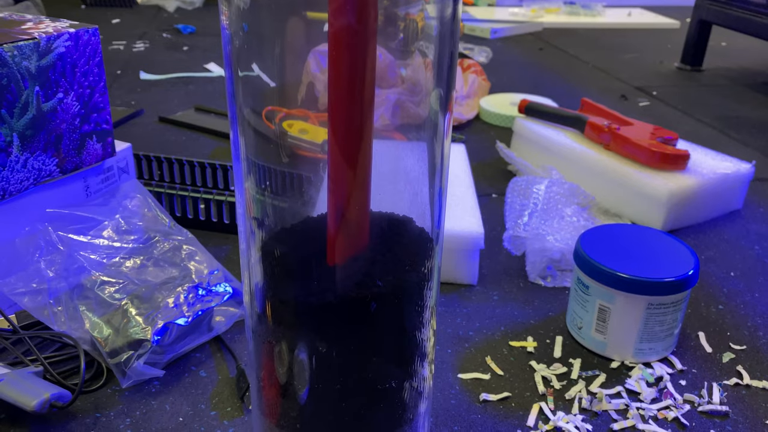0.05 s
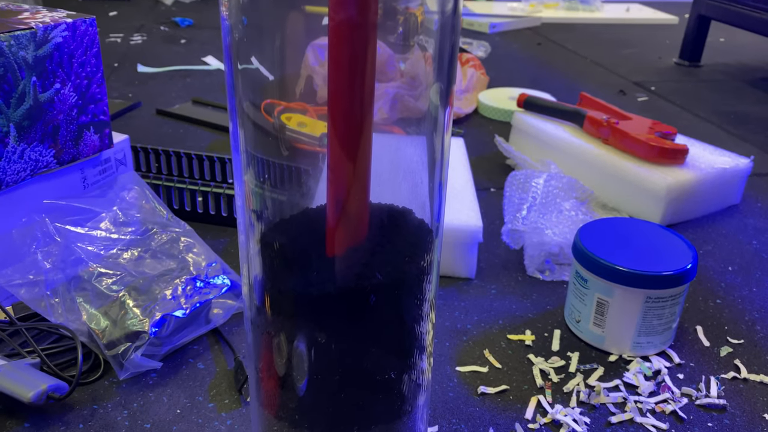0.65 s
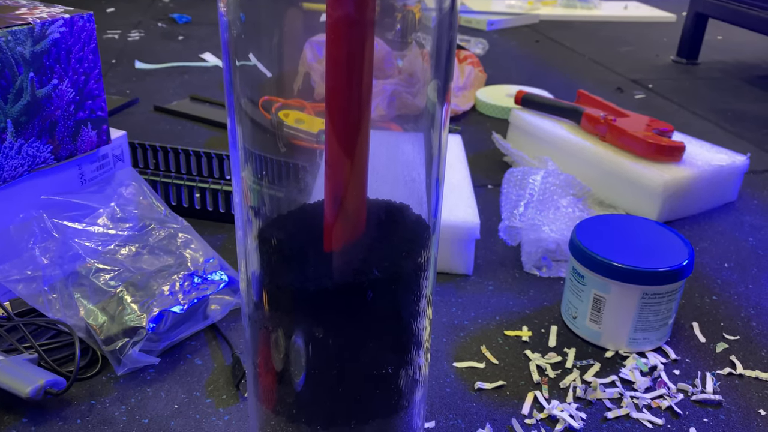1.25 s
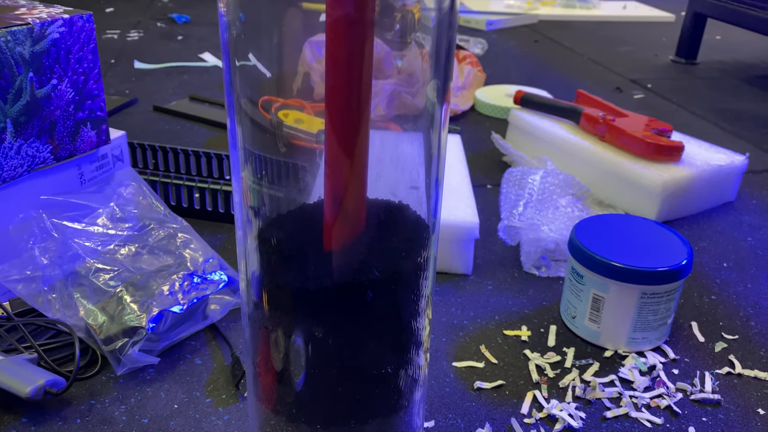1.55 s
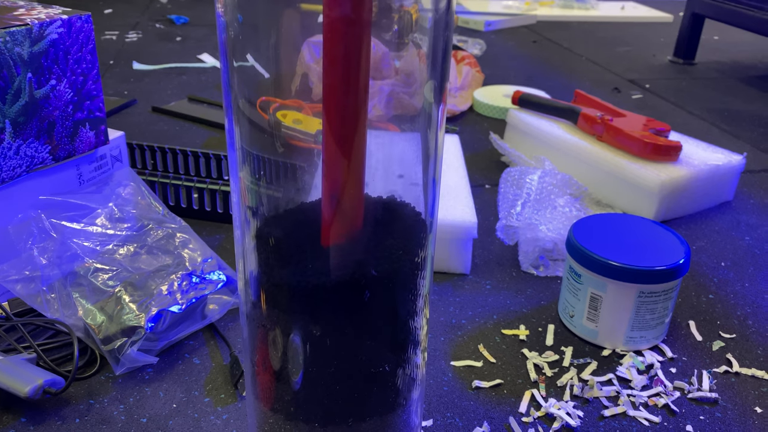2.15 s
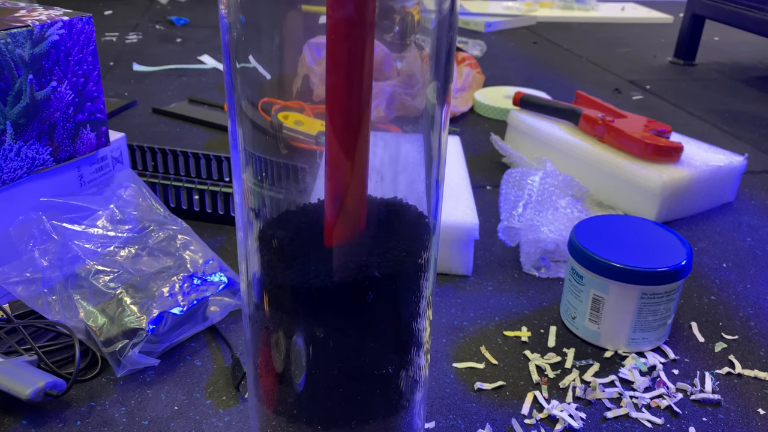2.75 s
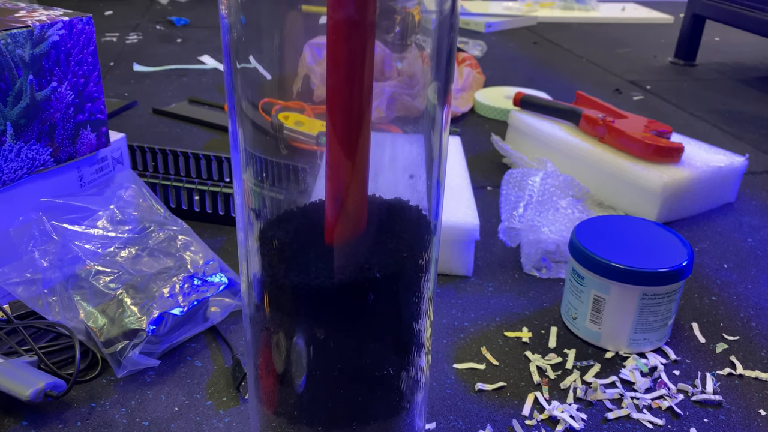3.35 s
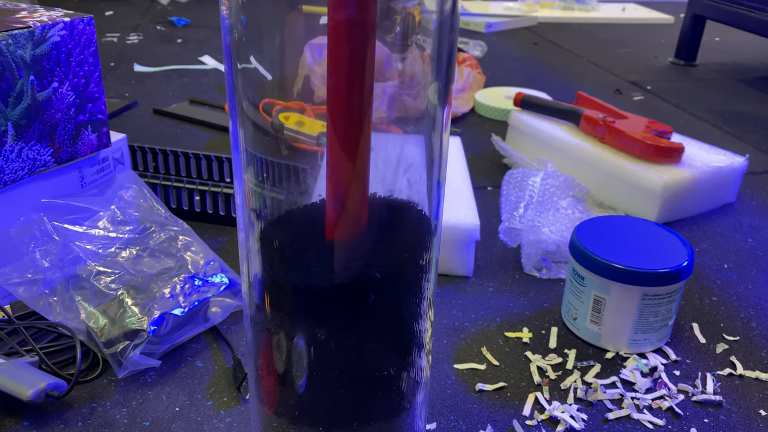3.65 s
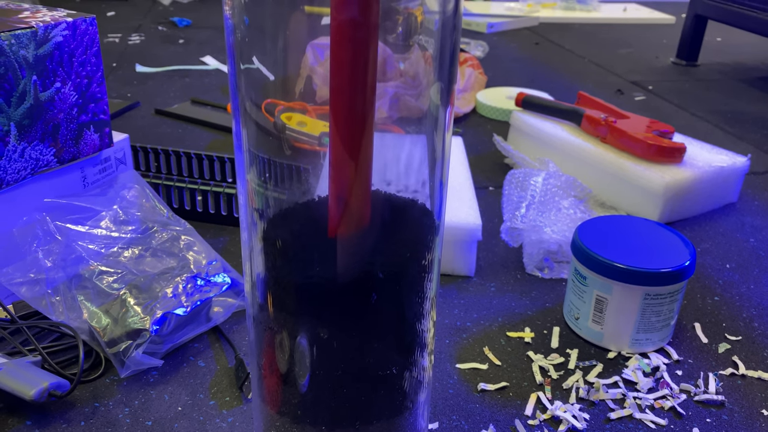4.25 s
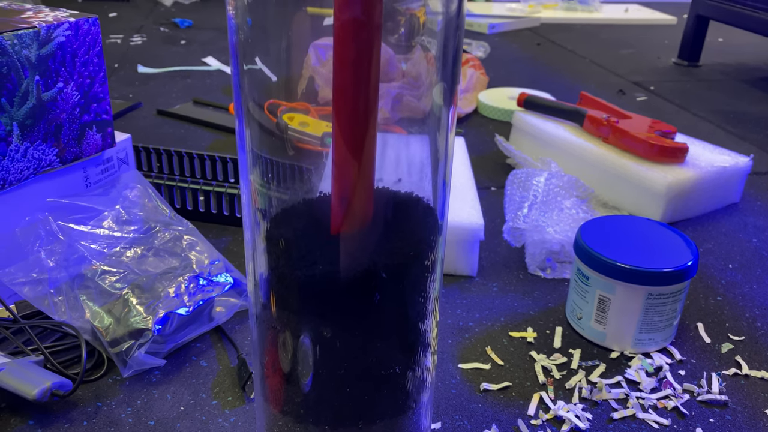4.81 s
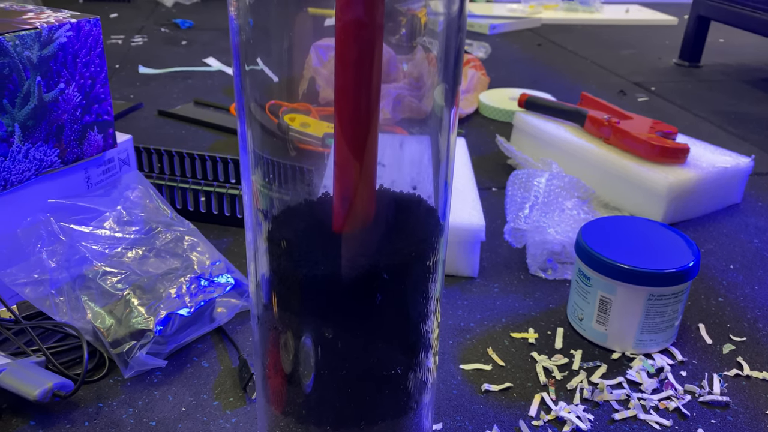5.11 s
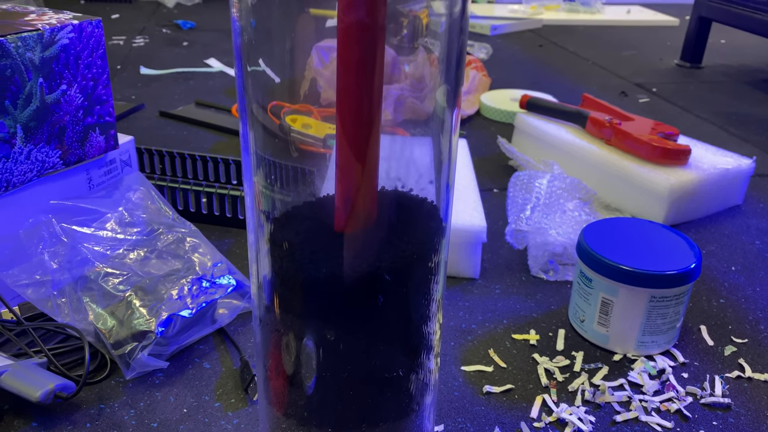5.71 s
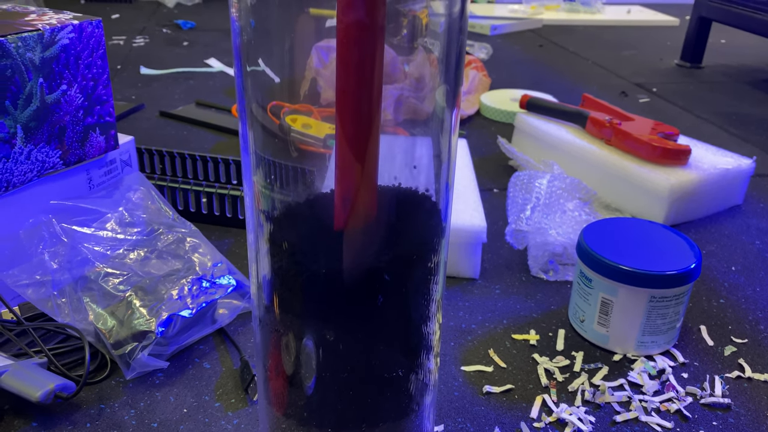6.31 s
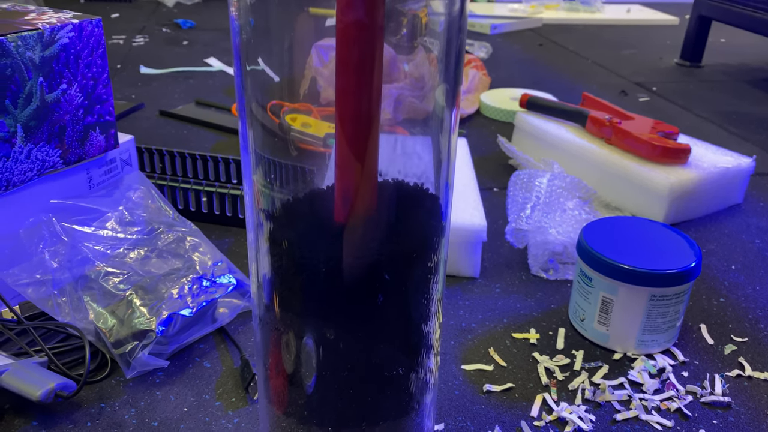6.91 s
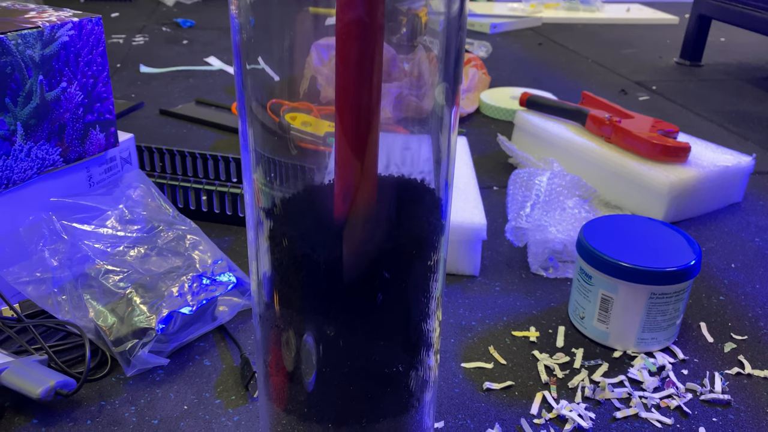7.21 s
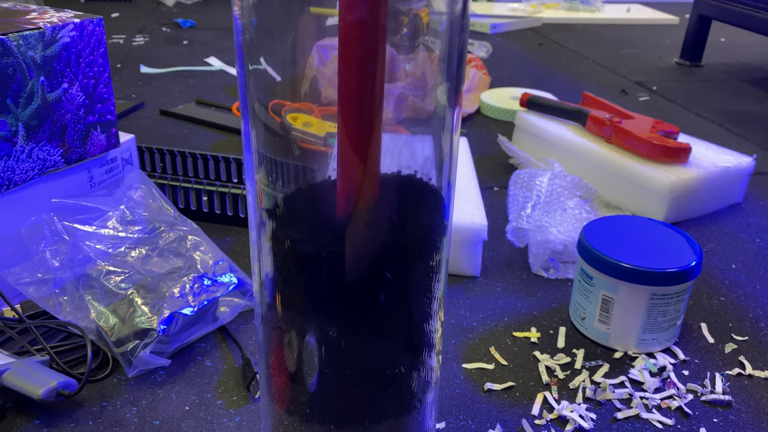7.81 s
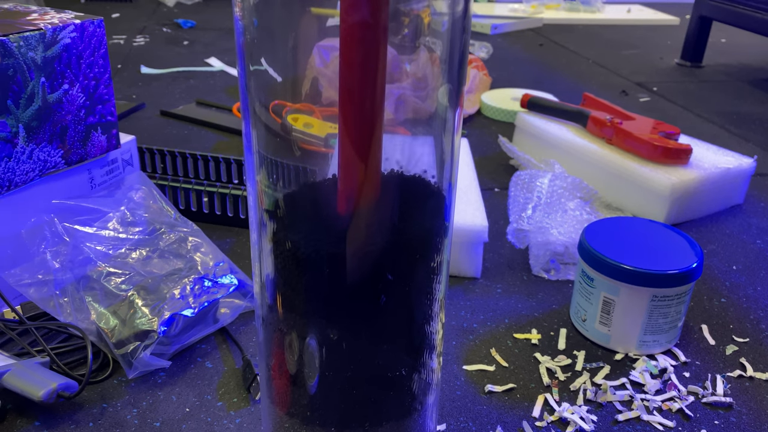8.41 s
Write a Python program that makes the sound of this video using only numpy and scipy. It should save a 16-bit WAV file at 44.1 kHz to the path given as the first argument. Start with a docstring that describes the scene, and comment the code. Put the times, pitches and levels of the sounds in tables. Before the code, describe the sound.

Air hisses from a hose, then water sputters into a plastic tube of filter grains and becomes a steady spray over a low pump rumble.

```python
"""Filling a water filter

Water is let into a nearby acrylic tube packed with filter grains. First air hisses out of the
feed hose and the fitting knocks; then the jet arrives, sputters and thickens to a steady spray.
The spray is many tiny impacts; bigger spits slap the wall, small bubbles ring, two large ones plop.
The room adds a short echo, and aquarium pumps and fans rumble behind it all."""
import sys
import numpy as np
from scipy import signal
from scipy.fft import rfft, irfft, next_fast_len
from scipy.io import wavfile
from scipy.ndimage import uniform_filter1d, map_coordinates

SR = 44100
rng = np.random.default_rng(int(sys.argv[2]) if len(sys.argv) > 2 else 0)


def to_wav(sig):
    """Store sig (one row per channel, or 1-D mono) as 16-bit WAV at the path in sys.argv[1].

    Samples outside -1..1 are clipped; the rate is SR.
    """
    pcm = np.clip(np.atleast_2d(sig), -1, 1) * 32767
    pcm = np.round(pcm).astype(np.int16)
    wavfile.write(sys.argv[1], SR, pcm.T)  # frames by channels


N = 381906

# A pair of signals is one part that both microphones share and one part that they do not.
# microphones() turns it into left and right. A decay_s is the time to fade by 60 dB.

# The biggest spits of water against the wall: start_s, level_db, splatter_s, brightness_db_per_octave
WALL_SPITS = [(0.116, -52, 0.011, -4), (0.2583, -37.5, 0.012, -5), (0.274, -42.5, 0.013, -5),
              (0.2887, -40, 0.019, -4), (0.3203, -36, 0.007, 1), (0.3377, -35, 0.009, -4),
              (0.351, -37, 0.02, 2), (0.361, -31, 0.022, 7), (0.375, -31, 0.017, 5),
              (0.4092, -34, 0.012, -1.0), (0.586, -29, 0.006, 0), (0.9462, -31.5, 0.018, -11),
              (1.2314, -39, 0.006, -1.0), (1.252, -33, 0.031, -4), (1.3057, -32.5, 0.014, -3),
              (1.3178, -32.5, 0.02, -5), (1.323, -30.5, 0.012, -4), (1.3734, -32, 0.009, -2),
              (1.392, -31.5, 0.019, 0), (1.4074, -33, 0.027, -4), (1.423, -30, 0.0076, 0),
              (1.4422, -31, 0.011, 1.0), (1.4712, -34.5, 0.037, -3.0), (1.484, -35, 0.0096, 1.0),
              (1.518, -34, 0.022, 0.0), (1.545, -29.5, 0.02, 0.0), (1.5649, -31.5, 0.012, 1.0),
              (1.6194, -28, 0.012, -2.0), (1.6358, -21.5, 0.0043, 2), (1.753, -28, 0.013, -1),
              (1.791, -26.5, 0.017, -2), (1.804, -31, 0.021, -1), (1.8529, -22.5, 0.011, -3),
              (1.863, -28, 0.012, -2), (1.969, -27.5, 0.012, 2), (2.0239, -33, 0.019, 1),
              (2.0583, -21.5, 0.007, 3), (2.068, -27, 0.015, 2), (2.1353, -24.5, 0.005, 3),
              (2.2398, -30, 0.017, -5), (2.2812, -30, 0.0094, -4), (2.325, -29.5, 0.014, -3),
              (2.401, -30.5, 0.023, 0), (2.4277, -20.5, 0.005, 0.5), (2.4482, -26.5, 0.013, -2),
              (2.5012, -24, 0.008, 4), (2.511, -25.5, 0.009, -3), (2.5264, -28, 0.007, 11),
              (2.5477, -23.5, 0.012, -2), (2.5769, -31.5, 0.035, -6), (2.5844, -28, 0.012, -3),
              (2.595, -31, 0.02, -3), (2.6156, -25, 0.0098, 1), (2.68, -32, 0.024, -1),
              (2.71, -33, 0.033, -3), (2.811, -28, 0.011, 1), (2.8513, -26, 0.007, -2),
              (2.8637, -28.5, 0.028, -2), (3.0378, -30, 0.018, -1), (3.1102, -31, 0.021, 0),
              (3.153, -25.5, 0.0088, 0), (3.1779, -23.5, 0.013, -1), (3.2076, -33, 0.009, 1),
              (3.273, -29, 0.0099, 2), (3.3065, -29.5, 0.024, -2), (3.327, -20.5, 0.0059, 2.0),
              (3.3731, -30, 0.011, -1.0), (3.3965, -24.5, 0.007, -3), (3.4339, -24.5, 0.009, -3),
              (3.6846, -26, 0.01, -3.0), (4.1276, -21.5, 0.012, -1), (4.8576, -30, 0.017, 0),
              (4.9334, -25, 0.018, 4), (4.947, -26, 0.008, 1), (5.096, -28, 0.027, -1),
              (5.1054, -27, 0.016, 1), (5.1465, -27.5, 0.016, 1.0), (5.2162, -25, 0.008, -3),
              (5.48, -27, 0.012, -1), (5.5312, -27.5, 0.015, -2), (6.487, -18.5, 0.0092, 0),
              (7.6251, -26.5, 0.025, -0.0)]
# Gushes of air ahead of the water; swell and fade are the times for a change of 20 dB:
# peak_s, swell_s, fade_s, rush_db, whistle_db, mist_db, mist_early_s
AIR_GUSHES = [(0.455, 0.10, 0.21, -50, -57, -44, 0.056), (0.985, 0.32, 0.5, -57, -58.5, -55, 0.0055)]

VALVE_S, VALVE_DB_PER_S = 0.252, 1513.5  # the valve opens, and how fast the air gets going
ARRIVAL_S, ARRIVAL_DB_PER_S = 1.29, 332  # the water reaches the hose end, and how fast it sets in
BASE_SPURT_RATE = 570  # sets how finely a jet of medium strength breaks up


def amp(db):
    """Turn decibels into a factor to multiply by."""
    return 10 ** (np.asarray(db) / 20)


def unit(x):
    """Scale x so that its average power is 1."""
    return x / np.sqrt(np.mean(x ** 2) + 1e-20)


def along(points, hz):
    """Read between (pitch_hz, value) points, with pitch spaced by octaves."""
    pitches, values = np.transpose(points)
    return np.interp(np.log(hz + 1), np.log(pitches + 1), values)


def wobble(per_second):
    """A smooth random curve that passes through per_second random values each second."""
    values = rng.standard_normal(int(N * per_second / SR) + 4)
    return map_coordinates(values, [np.arange(N) * per_second / SR])


def noise():
    """Two unrelated white noises."""
    return rng.standard_normal((2, N))


def add(track, start_s, sound):
    """Mix a sound into a track at the given time."""
    part = track[..., max(round(start_s * SR), 0):][..., :sound.shape[-1]]
    part += sound[..., :part.shape[-1]]


def filtered(x, response):
    """Multiply each frequency in x by response(hz)."""
    size = next_fast_len(N + SR // 2)
    return irfft(rfft(x, size) * response(np.fft.rfftfreq(size, 1 / SR)), size)[..., :N]


def equalised(x, gains):
    """Turn parts of x up or down along (pitch_hz, gain_db) points."""
    return filtered(x, lambda hz: amp(along(gains, hz)))


def coloured(x, spectrum, resonances=()):
    """Give x a tone colour, with a peak at each resonance; white noise keeps its power."""
    def response(hz):
        boost_db = sum(db / (1 + (2 * (hz - pitch) / width) ** 2) for pitch, width, db in resonances)
        return unit(amp(along(spectrum, hz) + boost_db))
    return filtered(x, response)


def pumps_and_fans():
    """Pumps and fans rumble, drone and hum a little unsteadily; now and then the bass swells."""
    # Tone colour of the steady rumble: pitch_hz, level_db
    rumble_colour = [(20, -29), (40, -11.5), (58, 1.5), (85, -0.7), (150, -6), (240, -10), (340, -15.5),
                     (480, -24), (780, -23.5), (1100, -35), (2200, -33.5), (3000, -42.5), (5500, -41),
                     (9500, -50.5), (15000, -57)]
    # Narrow bands where the fans drone: pitch_hz, width_hz, boost_db
    fan_drones = [(216, 22, 6), (355, 16, 5.5), (158, 16, 2.5)]
    # Moments when the rumble swells: peak_s, half_length_s, level_db
    swells = [(0.28, .1, -60), (1.007, 0.08, -53), (2.0, 0.14, -56.5), (2.557, 0.11, -56.5),
              (3.5, .09, -57), (3.85, 0.093, -56.5), (5.953, 0.09, -56)]
    # Tone colour of those swells: pitch_hz, level_db
    swell_colour = [(40, -35), (75, -6), (110, -3.5), (155, -2), (190, -21), (400, -48), (1000, -80)]
    # Tones of the pump hum: pitch_hz, level_db
    hum_tones = [(59.6, -65.5), (120, -69), (212, -74.5), (846, -87.5)]
    t = np.arange(N) / SR
    out = amp(-54.9 + 0.77 * wobble(7)) * coloured(noise(), rumble_colour, fan_drones)
    swelling = sum(amp(db) * np.exp(-((t - peak_s) / half_s) ** 2) for peak_s, half_s, db in swells)
    out += coloured(noise(), swell_colour) * swelling
    for hz, db in hum_tones:
        phase = 2 * np.pi * hz * t + 0.5 * wobble(3.02)
        out[0] += np.sqrt(2) * amp(db + 2.7 * wobble(3.08)) * np.sin(phase)
    return out


def room_echo(x, pieces=44):
    """The room's short echo dies faster in the treble; its tail is redrawn often so no pitch rings."""
    # How long the echo lasts: pitch_hz, decay_s
    room_decay = [(300, 0.39), (3000, 0.25), (14000, 0.081)]
    out, hop = np.zeros((2, N)), N // pieces + 1
    for start in range(0, N, hop):
        hz, t, bands = signal.stft(rng.standard_normal((2, SR // 3)), SR, nperseg=256)
        fade = amp(-60 * t / along(room_decay, hz)[:, None])
        tail = signal.istft(bands * fade, SR, nperseg=256)[1]
        tail /= np.linalg.norm(tail[0])
        add(out, start / SR, signal.fftconvolve(x[:, start:start + hop], tail, axes=1))
    return out


def knocks_and_plops():
    """The hose knocks, and later two large bubbles plop: each is a dull tap and a hollow ring."""
    # Early hose knocks, then two bubble plops: start_s, level_db, pitch_factor, hardness_db
    events = [(0.769, -32.5, 1.0, -20), (0.7895, -55, 1.0, -20), (0.8235, -44, 1.0, 4),
              (0.8384, -48, 0.92, 8), (0.8407, -41, .9, -8), (6.339, -35, 1, -8), (6.6747, -39, 0.93, -8)]
    # Hollow tones of the tube: pitch_hz, level_db, decay_s
    tube_tones = [(1310, 0, .016), (1228, -5, .03), (1432, -7, .03)]
    # Higher tones, heard as a rattle in a hard knock: pitch_hz, level_db, decay_s
    high_tones = [(2150, -7, .03), (2600, -10, .025)]
    rings, taps, t = np.zeros((2, N)), np.zeros((2, N)), np.arange(SR // 6) / SR
    attack_s, tap_decay_s = 0.0008, 0.016
    onset = 1 - np.exp(-t / attack_s)
    for start_s, db, pitch_factor, hardness_db in events:
        add(taps, start_s, amp(db - 18 - 60 * t / tap_decay_s) * rng.standard_normal((2, len(t))))
        highs = [(hz, tone_db + hardness_db, decay_s) for hz, tone_db, decay_s in high_tones]
        for hz, tone_db, decay_s in list(tube_tones) + highs:
            phase = np.array([[0], [rng.uniform(0, 2 * np.pi)]])  # the shared part starts in step
            ring = np.sin(2 * np.pi * hz * pitch_factor * t + phase) * amp(-60 * t / decay_s) * onset
            add(rings, start_s, amp(db + tone_db - 8) * ring)
    return rings + coloured(taps, [(400, -10), (1300, -9), (2300, -20), (5000, -42)])


def gush_db(peak_s, swell_s, fade_s):
    """Once the valve is open, a gush swells to 0 dB and dies away, each at a steady dB per second."""
    t = np.arange(N) / SR
    open_db = 20 * np.minimum((t - peak_s) / swell_s, (peak_s - t) / fade_s)
    shut_db = VALVE_DB_PER_S * np.maximum(VALVE_S - t, 0)
    return np.maximum(open_db - shut_db, -100)


def escaping_air():
    """Trapped air rushes through the hose in gushes and squirts past the water with a breathy whistle."""
    # Tone colour of the rushing air: pitch_hz, level_db
    rush_colour = [(500, -41), (950, -16), (1220, -7.5), (1700, -7), (2400, -2), (3200, -2.5), (4000, -0.5),
                   (6000, 0.5), (10000, -10.5)]
    # Resonances of the air in the hose: pitch_hz, width_hz, boost_db
    hose_resonances = [(1150, 120, 7), (1630, 110, 7), (1900, 110, 4), (2390, 180, 6), (3050, 340, 5.5),
                       (5790, 160, 6), (6710, 140, 5), (7810, 120, 8)]
    # Tone colour of the whistle: pitch_hz, level_db
    whistle_colour = [(3500, -28), (4350, -8), (4750, 5), (5100, 10), (5400, 7), (5900, -8), (9000, -30)]
    # Short squirts of air past slugs of water: peak_s, whistle_db
    squirts = [(0.587, -55), (0.622, -61), (0.949, -52), (0.983, -55), (1.0, -51), (1.012, -51),
               (1.16, -62)]
    t = np.arange(N) / SR
    air_passing = uniform_filter1d(1.0 * ((t > VALVE_S) & (t < ARRIVAL_S)), size=SR // 50)
    rush, whistle = 0, amp(-76) * air_passing  # the hose sings faintly until the water arrives
    for peak_s, swell_s, fade_s, rush_db, whistle_db, _, _ in AIR_GUSHES:
        strength_db = gush_db(peak_s, swell_s, fade_s)
        rush = rush + amp(rush_db + strength_db)
        whistle = whistle + amp(whistle_db + 2 * strength_db)  # only a strong gush whistles
    for peak_s, db in squirts:
        whistle = whistle + amp(db) * np.exp(-((t - peak_s) / 0.0049) ** 2)
    throaty_noise = coloured(noise(), rush_colour, hose_resonances)
    flutter = amp(1.6 * wobble(110))
    return flutter * (rush * throaty_noise + whistle * coloured(noise(), whistle_colour))


def hose_flow():
    """Level in dB and spurt rate of what leaves the hose: mist blown by the gushes, then the jet."""
    # Strength of the water jet: time_s, level_db
    jet_strength = [(1.25, -46.5), (1.5, -47), (1.7, -43.5), (2.05, -44), (2.25, -47.5), (2.6, -46),
                    (3.05, -47.5), (3.385, -43), (3.42, -40.5), (3.49, -42.5), (3.6, -40), (3.95, -40.5),
                    (4.3, -41), (4.5, -42.5), (4.72, -42), (4.88, -44.5), (5.2, -43), (5.45, -43.5),
                    (5.8, -42), (6.07, -40), (6.52, -38), (6.73, -40), (6.95, -38.5), (7.25, -38.4),
                    (7.42, -40.5), (7.85, -39.5), (8.15, -39.5), (8.4, -40), (8.66, -40.5)]
    # Air pockets in the hose that interrupt the jet: middle_s, length_s, depth_db
    air_pockets = [(1.279, 0.033, 21), (1.347, 0.043, 13), (1.385, .008, 16), (1.462, 0.024, 8),
                   (1.511, 0.009, 9), (1.832, .016, 10), (2.097, 0.047, 5.5), (2.194, 0.043, 12),
                   (2.38, 0.017, 13), (2.671, 0.0087, 20), (2.494, .012, 8), (2.526, 0.019, 4),
                   (2.562, .02, 12), (2.83, 0.036, 3), (3, 0.038, 3), (3.197, 0.02, 9), (4.057, 0.03, 3),
                   (4.982, 0.05, 3), (5.134, 0.019, 10), (5.272, 0.013, 20), (5.472, 0.013, 7)]
    medium_db, doubling_db, soak_s = -43.5, 5, 1.3
    t = np.arange(N) / SR
    flow_db = np.interp(t, *np.transpose(jet_strength))
    # A stronger jet breaks up more finely; dry grains make it coarser until they have soaked.
    dryness = np.exp(-np.maximum(t - ARRIVAL_S, 0) / soak_s)
    doublings = (flow_db - medium_db) / doubling_db - 0.7 * dryness
    jet_rate = np.clip(BASE_SPURT_RATE * 2 ** doublings, 230, 1300)
    flow_db += 0.76 * np.sqrt(BASE_SPURT_RATE / jet_rate) * wobble(15)  # a coarse jet surges more
    for middle_s, length_s, depth_db in air_pockets:
        shape = signal.windows.tukey(int(length_s * SR), 0.7)
        shove_then_gap_db = np.concatenate([4 * shape, -depth_db * shape])
        add(flow_db, middle_s - length_s / 2 - length_s, shove_then_gap_db)
    water_power = amp(flow_db - ARRIVAL_DB_PER_S * np.maximum(ARRIVAL_S - t, 0)) ** 2
    dribble_db, mist_rate = -91, 310
    mist_power = amp(dribble_db) ** 2
    for peak_s, swell_s, fade_s, _, _, mist_db, early_s in AIR_GUSHES:
        mist_power += amp(mist_db + gush_db(peak_s - early_s, swell_s, fade_s)) ** 2
    power = water_power + mist_power
    return 10 * np.log10(power), (water_power * jet_rate + mist_power * mist_rate) / power


def in_tube(x):
    """Give x the tone colour of water striking the grains inside the hollow tube."""
    # Tone colour of spray on the grains: pitch_hz, level_db
    spray_colour = [(120, -53), (300, -14.5), (520, -21.5), (950, -22.5), (1300, -20.5), (2500, -15),
                    (3800, -11.5), (4600, -7.5), (5600, -5), (7000, -1), (9900, 0.6), (12200, 1.03),
                    (14300, -3.5), (15700, -11)]
    # Resonances of the wet tube: pitch_hz, width_hz, boost_db
    tube_resonances = [(810, 150, 5.5), (1810, 200, 2.5), (2280, 200, 1.5), (3030, 240, 2.8),
                       (3780, 200, 1.5), (4650, 420, 3), (5400, 250, 1), (6040, 250, 3.5), (6950, 400, 2.2),
                       (7500, 400, 1.3), (8050, 450, 1.2)]
    return coloured(x, spray_colour, tube_resonances)


def bubbles(level_db, count=1400):
    """Small bubbles ring and rise in pitch where the jet meets the wet grains."""
    out, t = np.zeros((2, N)), np.arange(SR // 40) / SR
    for when, pitch, faintness, side in rng.random((count, 4)):
        start = int(when * (N - 1))
        pitch_hz = 1100 * 6 ** pitch
        cycles = pitch_hz * t
        rising_tone = np.sin(2 * np.pi * cycles * (1 + 0.00078 * cycles))
        ring = rising_tone * np.exp(-cycles / 11) * (1 - np.exp(-cycles))
        placement = np.array([[1], [2 * side - 1]])
        add(out, start / SR, amp(level_db[start] + 0.5 - 9.5 * faintness) * placement * ring)
    return in_tube(out)


def droplets(level_db, per_second=26, life_s=0.0002):
    """Single droplets land with tiny sharp crackles."""
    hits = rng.random(N) < per_second / SR
    sizes = hits * amp(level_db + 7 - 10 * rng.random(N))
    shape = np.exp(-np.abs(np.arange(-SR // 400, SR // 400)) / SR / life_s)
    clicks = signal.fftconvolve(sizes, shape, mode="same") * noise()
    return equalised(clicks, [(2000, 6.5), (12000, 6.9)])


def spits():
    """Big slugs of water slap the wall: a sharp front, then a splatter that soon breaks off."""
    out, t = np.zeros((2, N)), np.arange(SR // 30) / SR
    attack_share, hold_share = 0.035, 0.18  # shares of splatter_s: small slugs snap, big ones splash
    octaves = np.log2(np.clip(np.fft.rfftfreq(len(t), 1 / SR), 4500, 14000) / 9000)
    for start_s, db, splatter_s, brightness in WALL_SPITS:
        spectrum = rfft(rng.standard_normal((2, len(t)))) * amp(brightness * octaves)
        drops = unit(irfft(spectrum, len(t)))
        front = 1 - np.exp(-t / (attack_share * splatter_s))
        fade = np.exp(-(t / (hold_share * splatter_s)) ** 2)
        add(out, start_s, amp(db) * front * fade * drops)
    return in_tube(equalised(out, [(2000, -6.5), (6000, -3.5), (12000, -3.2)]))


def thinning(spurt_rate):
    """The jet gets quieter for a moment while a big slug gathers; a full jet dips less."""
    dip, t = np.zeros(N), np.arange(SR // 45) / SR
    for start_s, *_ in WALL_SPITS:
        add(dip, start_s - 0.75 * t[-1], np.hanning(len(t)))
    depth_db = 7 * np.minimum(1, BASE_SPURT_RATE / spurt_rate)
    return amp(-depth_db * np.minimum(dip, 1))


def spurt_power(per_second, scatter_db, life_s):
    """The power of spurts of random timing and size, each swelling as fast as it dies."""
    hits = rng.random(N) < per_second / SR
    sizes = amp(scatter_db * np.clip(rng.standard_normal(N), -2, 2)) ** 2
    lives = np.arange(-SR // 50, SR // 50) / SR / life_s
    return np.abs(signal.fftconvolve(hits * sizes, np.exp(-np.hypot(lives, 1)), mode="same"))


def water_jet(level_db, spurt_rate):
    """Air and water leave the hose in spurts, each a clump of tiny impacts; many merge into a hiss."""
    rate = spurt_rate * amp(1.3 * wobble(70))
    power = spurt_power(rate * 0.76, scatter_db=0.9, life_s=0.00053)
    power += spurt_power(rate * 0.4, scatter_db=0.5, life_s=0.0002)
    power /= np.abs(uniform_filter1d(power, size=SR // 25)) + 1e-9  # the supply of water is steady
    impacts = unit(noise() * amp(2.85 * wobble(6000)))
    spurts = impacts * np.sqrt(power) * amp(level_db + 0.96)
    spurts = equalised(spurts, [(2000, -3.0), (6000, 0), (12000, 0.34)])
    # The wetter the grains, the more a duller fizz of bursting water films fills the gaps.
    wetness_db = 5 * np.log10(rate / 1000)
    films = unit(noise() * amp(2.4 * wobble(900)))
    fizz = films * amp(uniform_filter1d(level_db, size=SR // 20) + wetness_db - 4.0)
    fizz = equalised(fizz, [(2500, 6.5), (6000, 4.0), (12000, -3.0)])
    cushion_db = 1.5 * np.log2(rate / BASE_SPURT_RATE)  # deeper water softens the single clicks
    return in_tube(spurts + fizz + droplets(level_db - cushion_db))


def microphones(pair):
    """Two microphones hear a pair as left and right, with level and timing that vary by pitch."""
    # How alike the two sides are: pitch_hz, likeness (0 to 1)
    likeness = [(50, .72), (120, .84), (270, .88), (580, .35), (830, .78), (1050, .25), (1280, .72),
                (1750, .18), (2050, .25), (2450, .6), (2750, .35), (3000, .72), (3750, .28), (4050, .65),
                (4600, .55), (4950, .25), (5550, .22), (6200, .62), (8800, .94), (12300, .93), (15000, .88)]
    # How far the left wave is ahead of the right: pitch_hz, lead_radians
    left_lead = [(200, 0), (950, -1.2), (1200, -.1), (1650, -1.4), (2100, 1.5), (2500, 0), (4300, 0),
                 (5400, -1.3), (6100, -.1), (6700, .15), (7400, 1.5), (9100, 3.14), (12300, 6.28),
                 (15300, 9.5)]
    # How much louder the left side is: pitch_hz, left_minus_right_db
    balance = [(300, 1), (700, 0), (1050, -4), (1400, 0), (2100, 1.3), (2700, -1), (4000, -1), (4850, -3.5),
               (5700, -1), (7500, 1.6), (8700, 0)]
    half_each = np.array([[0.5], [-0.5]])

    def blend(hz):
        angle = np.arccos(np.clip(along(likeness, hz), 0, 1)) / 2
        return np.array([np.cos(angle), np.sin(angle)])

    def paths(hz):
        lead = np.interp(hz, *np.transpose(left_lead))
        return amp(half_each * along(balance, hz)) * np.exp(1j * half_each * lead)

    shared, apart = filtered(pair, blend)
    return filtered(np.array([shared + apart, shared - apart]), paths)


def scene():
    """The filter tube close by, its echo, and the machines behind it."""
    level_db, spurt_rate = hose_flow()
    spray = water_jet(level_db, spurt_rate) * thinning(spurt_rate)
    tube = spray + spits() + escaping_air() + knocks_and_plops() + bubbles(level_db)
    return microphones(tube + amp(-9.0) * room_echo(tube) + pumps_and_fans())


def record(dry, top_hz=15800):
    """The phone keeps nothing above top_hz."""
    return filtered(dry, lambda hz: hz < top_hz)


dry = scene()
out = record(dry)
to_wav(out)
```